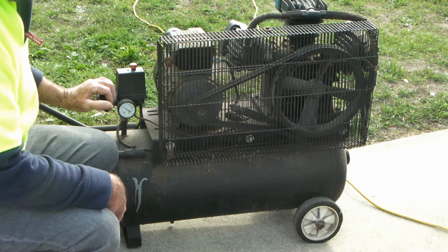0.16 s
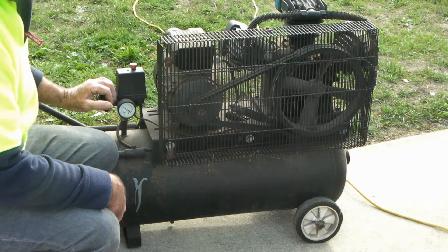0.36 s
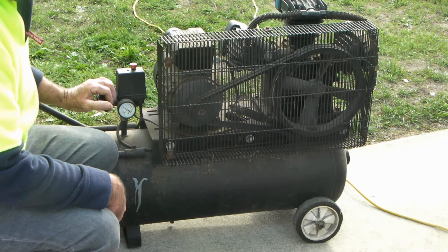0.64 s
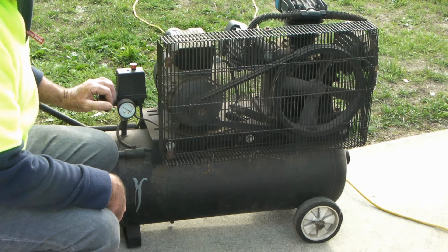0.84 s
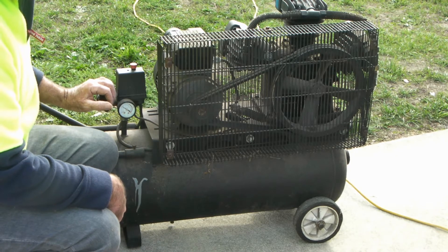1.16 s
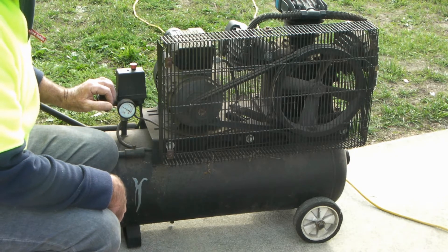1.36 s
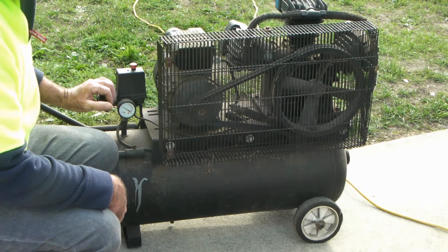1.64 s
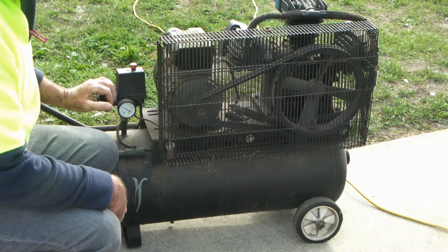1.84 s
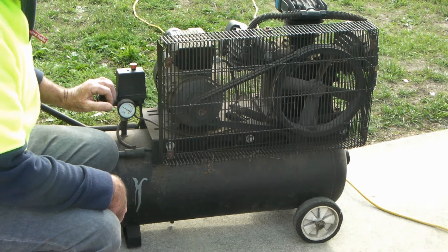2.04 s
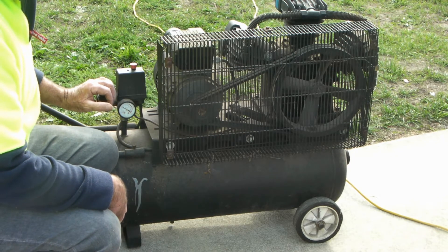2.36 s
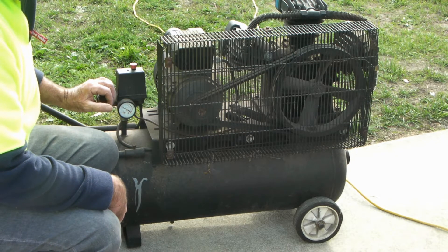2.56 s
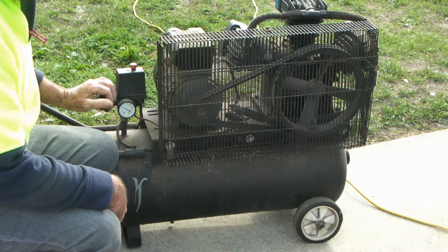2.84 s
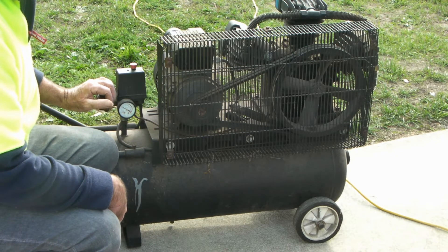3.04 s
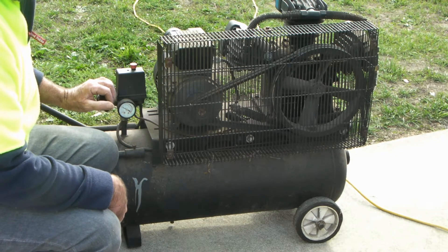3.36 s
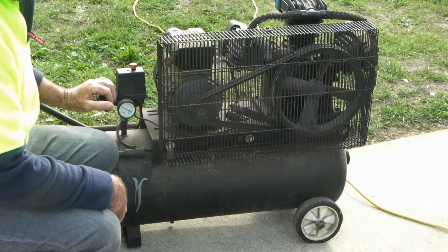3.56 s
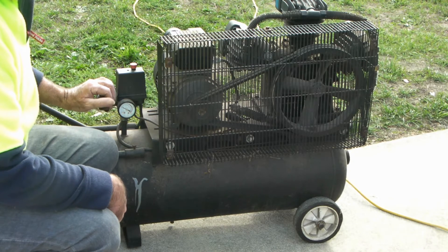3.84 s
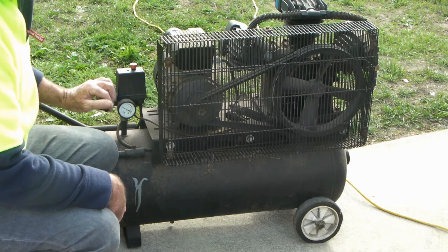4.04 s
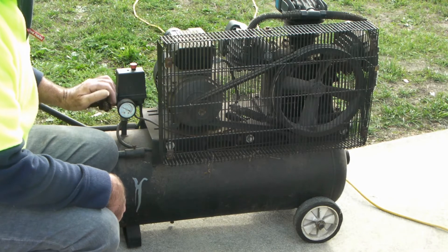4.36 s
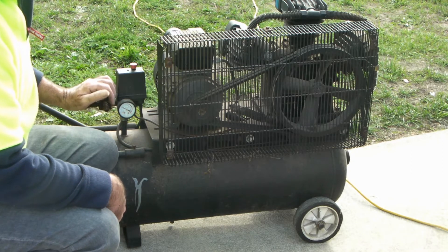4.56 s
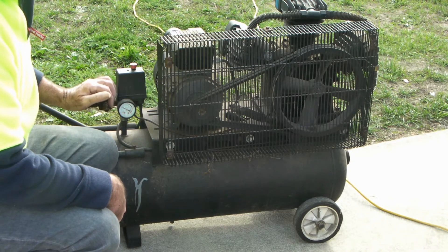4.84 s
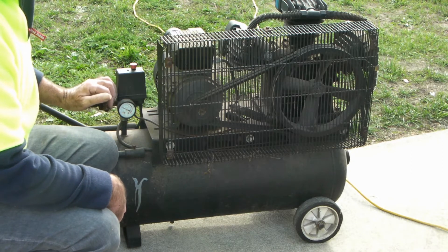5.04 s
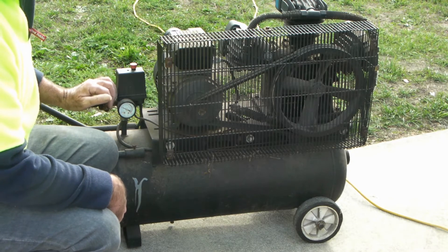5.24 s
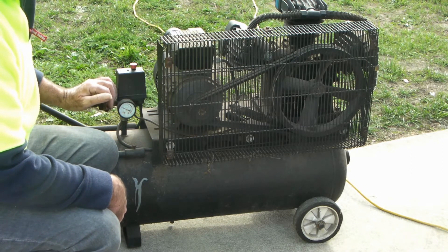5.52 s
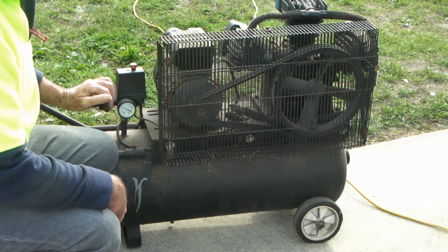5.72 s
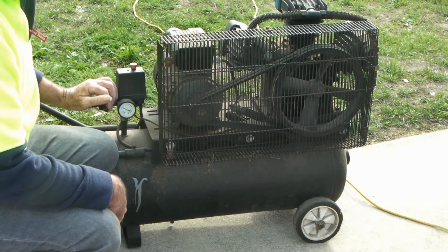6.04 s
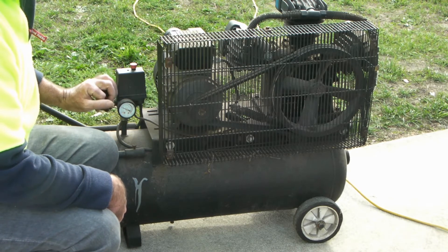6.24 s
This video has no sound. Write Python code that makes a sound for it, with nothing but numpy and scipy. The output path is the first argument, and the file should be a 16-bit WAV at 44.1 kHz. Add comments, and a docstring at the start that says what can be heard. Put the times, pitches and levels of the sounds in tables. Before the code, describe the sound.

A loud steady jet of compressed air hisses from a compressor tank outdoors, narrows to a whistling fizz, spits and shuts off abruptly.

```python
"""A loud jet of air roars while its valve is wide, thins to a whistling fizz as it narrows, spits and is shut.
Compressed air vents from the tank of a stopped workshop compressor outdoors, and a hand works the valve.
The jet is banded noise steered by valve and tank; resonant noise makes the ring, whistle and last wheeze.
A concrete slab reflects the hiss, machine and yard add short tails, and a faint distant hum lies beneath."""
import sys
import numpy as np
from scipy import signal
from scipy.fft import rfft, irfft
from scipy.io import wavfile

SR = 44100
rng = np.random.default_rng(int(sys.argv[2]) if len(sys.argv) > 2 else 0)


def generate_wav(signal):
    """Clip the signal to [-1, 1] and save it as 16-bit WAV at the path in sys.argv[1]."""
    frames = np.transpose(np.atleast_2d(signal))
    scaled = np.clip(frames, -1, 1) * 32767
    pcm = np.round(scaled).astype(np.int16)
    wavfile.write(sys.argv[1], SR, pcm)


N = 281792
TIME = np.arange(N) / SR  # s
FREQ = np.maximum(np.arange(N // 2 + 1) * SR / N, 1)  # Hz, kept above 0 for the logarithms

SPIT_S, SHUT_S = 6.056, 6.118
OUTDOORS_DB = -56.5
TOP_HZ = 15640  # upper edge of the sound

# Outdoor background colour. Each row: frequency in Hz, relative level in dB per Hz.
OUTDOORS_COLOUR = [(20, -24), (50, -6), (90, 3), (150, -8), (260, -13), (450, -4), (800, -9), (1500, -18),
                   (4000, -32), (9000, -32), (15000, -32)]
# Partials of the distant hum. Each row: centre frequency in Hz, level in dB before it wavers.
HUM_PARTIALS = [(47, -77), (83.8, -64.5), (100, -70), (144, -63.5)]
# Light wind on the microphone. Each row: time in s, level in dB before it wanders.
WIND_LEVEL = [(0, -63), (2.1, -67), (2.6, -80), (6.39, -80)]
# The two microphone ports. Each row: frequency in Hz, likeness from 0 to 1,
# left minus right level in dB, left phase lead in rad.
PORT_DIFFERENCES = [(100, 0.94, 0.5, .1), (1500, 0.96, 1.5, 0.11), (4060, 0.97, 1.1, .05),
                    (5120, 0.75, -1.5, 0.27), (5850, 0.24, 3, 1.24), (6800, 0.48, 3, 0.45),
                    (8650, 0.36, 5.5, .45), (9400, .54, 3.5, .15), (10200, 0.46, 3, 1.7),
                    (13000, 0.2, 4, .6), (15500, 0.5, 2, .3)]
# Turbulence of the free jet. Each row: frequency in Hz, relative level in dB per Hz.
JET_SPECTRUM = [(50, -35), (145, -17), (205, -24), (300, -23.5), (338, -11.5), (405, -5.5), (600, -11),
                (780, -10.5), (1200, -7.5), (1700, -6.5), (2400, -2.5), (3100, -0.5), (4500, -1.7),
                (5000, -1.4), (5500, -4.5), (7000, -2.5), (8400, -2.5), (9800, -2.6), (10500, -4),
                (13000, -5.5), (14300, -6), (15600, -7.3)]
# Resonances of the open valve body. Each row: frequency in Hz, damping width in Hz, relative level in dB.
BODY_MODES = [(907, 230, -6.5), (1530, 370, 1.2), (2270, 470, -5)]
# Resonances that sing as the gap narrows. Each row: frequency in Hz, damping width in Hz, relative level in dB.
GAP_MODES = [(2380, 330, -0.5), (4000, 420, 3), (9660, 1250, -6), (13000, 700, -8)]
# The hand on the valve. Each row: time in s, opening from 0 (nearly shut) to 1 (wide).
VALVE_OPENING = [(0, 0.44), (1.7, 0.6), (2.45, 0.75), (2.64, 0.91), (2.76, 0.9), (2.8, 0.34), (3.27, 0.42),
                 (3.48, .7), (3.7, 0.38), (3.88, 0.27), (4.0, 0.71), (4.14, 0.69), (4.26, 0.16),
                 (4.8, 0.15), (5.2, 0.33), (5.55, 0.13), (6.04, 0.56)]
# How each part of the jet follows valve and tank. Each holds: level in dB half open on a full tank,
# gain in dB from nearly shut to wide, loss in dB per s as the tank empties.
ROAR_FLOW = (-31, 4.3, 0.53)
HISS_FLOW = (-18, 2.3, 0.43)
FIZZ_FLOW = (-22, -2, 0.29)
HOLLOW_FLOW = (-31.5, 16, 0.12)
SEAT_FLOW = (-32.8, -11, 0)
# Breathy whistle at the edge of the gap. Each row: time in s, level in dB before it wavers.
WHISTLE_LEVEL = [(0, -35), (2.5, -30), (2.7, -45), (2.86, -34), (3.78, -33), (4.0, -46), (4.55, -35),
                 (4.76, -27.5), (5.5, -26.5), (6.04, -29)]


def undb(db):
    """Decibels to gain."""
    return 10 ** (np.asarray(db) / 20)


def unit(x):
    """Scale to rms 1."""
    return x / np.sqrt(np.mean(x ** 2))


def over_time(table):
    """The second column of a table, joined by straight lines in time."""
    return np.interp(TIME, *np.transpose(table))


def over_freq(table):
    """The columns of a table, joined by lines on a log-frequency axis."""
    hz, *columns = np.transpose(table)
    return [np.interp(np.log(FREQ), np.log(hz), column) for column in columns]


def shaped(x, response):
    """Filter by a frequency response."""
    return irfft(rfft(x) * response, N)


def below(hz, order):
    """Low-pass curve from 1 to 0 that passes one half at hz."""
    return 1 / (1 + (FREQ / hz) ** order)


def resonance(hz, width_hz):
    """Response of one damped resonance, gain 1 at its centre."""
    return 1 / (1 + 1j * (FREQ ** 2 - hz ** 2) / (FREQ * width_hz))


def modes(table):
    """Steep-sided resonances whose powers add, as if each were stirred by its own eddies."""
    power = sum(undb(2 * db) * np.abs(resonance(hz, width)) ** 4 for hz, width, db in table)
    return np.sqrt(power)


def walk(rate):
    """Smooth random wander of spread 1, up to about rate changes a second."""
    return unit(shaped(rng.standard_normal(N), below(rate, order=4)))


def air_noise(response):
    """Coloured noise at the two ports: nearly alike in the bass, less so in the treble."""
    likeness, left_db, lead = over_freq(PORT_DIFFERENCES)
    likeness = np.clip(likeness, 0, 1)
    mid, side = rfft(rng.standard_normal((2, N)))
    sign = np.array([[1], [-1]])  # left, right
    pair = mid * np.sqrt(1 + likeness) + sign * side * np.sqrt(1 - likeness)
    balance = undb(sign * left_db / 2)
    phase = np.exp(.5j * sign * lead)
    return unit(irfft(pair * response * balance * phase, N))


def outdoors():
    """A soft low bed of noise with a distant hum that wavers in level and pitch."""
    bed_db = OUTDOORS_DB + 1.6 * walk(rate=2.3)
    bed = air_noise(undb(over_freq(OUTDOORS_COLOUR)[0])) * undb(bed_db)
    hum = 0
    for hz, db in HUM_PARTIALS:
        level = undb(db + 2.0 * walk(rate=6.8))
        pitch_hz = hz + 1.94 * walk(rate=5.7)
        hum = hum + level * np.sin(2 * np.pi * np.cumsum(pitch_hz) / SR)
    return bed + np.sqrt(2) * hum  # root 2 turns rms level into sine peak


def wind():
    """Light wind pushes on the microphone as a deep, narrow band of noise."""
    rumble = air_noise(below(45, order=4) * (1 - below(30, order=4)))
    return rumble * undb(over_time(WIND_LEVEL) + 2 * walk(rate=4))


def echoes(x, db, t60_s, dull_hz, first_s):
    """A dense, fading cloud of reflections, different at each port."""
    tail = rng.standard_normal((2, N)) * undb(-60 * TIME / t60_s) * (TIME > first_s)
    tail = tail / np.sqrt(np.sum(tail ** 2, axis=1, keepdims=True))
    dulled = shaped(x, np.sqrt(below(dull_hz, order=4)))
    return undb(db) * signal.fftconvolve(dulled, tail, axes=1)[:, :N]


def slab(lag_ms=1.28, share=0.18, dull_hz=7500):
    """The bounce off the concrete arrives just after the direct sound and ripples its spectrum."""
    delay = np.exp(-2j * np.pi * FREQ * lag_ms / 10 ** 3)
    return 1 + share * below(dull_hz, order=4) * delay


def closing(fall_s, start_s=SHUT_S):
    """The flow dies away exponentially as the valve meets its seat."""
    return np.exp(-np.maximum(TIME - start_s, 0) / fall_s)


def flow(db, opening_db, sag_db_per_s):
    """Gain of one part of the jet: it follows the valve and sinks with the tank pressure."""
    opening = over_time(VALVE_OPENING)
    return undb(db + opening_db * (opening - .5) - sag_db_per_s * TIME)


def wheeze(db=-26, hz=6100, width_hz=3200, start_s=6.09, rise_s=0.021, fall_s=0.04):
    """The last air squeezes past the seat in a soft, fading sizzle."""
    age = np.maximum(TIME - start_s, 0)
    swell = (1 - np.exp(-age / rise_s)) ** 2 * np.exp(-age / fall_s)
    return air_noise(resonance(hz, width_hz) ** 2) * undb(db) * swell / swell.max()


def spit(db=-14.0, rise_s=0.0041, fall_s=0.06, edge_hz=5200):
    """Just before it shuts, the gap throws a short bright burst."""
    age = np.maximum(TIME - SPIT_S, 0)
    burst = (1 - np.exp(-age / rise_s)) * np.exp(-age / fall_s)
    colour = np.sqrt((1 - below(edge_hz, order=6)) * below(11400, order=4))
    return air_noise(colour) * undb(db) * burst / burst.max() * closing(fall_s=0.024)


def whistle(hz=9050, width_hz=1200, rise_hz_per_s=300, narrow_s=4.75):
    """The edge of the gap sings a breathy whistle that creeps upward once the valve is narrow."""
    age = np.maximum(TIME - narrow_s, 0)
    glide = np.exp(2j * np.pi * np.cumsum(rise_hz_per_s * age) / SR)
    breath = air_noise(resonance(hz, width_hz) ** 2)
    tone = np.real(signal.hilbert(breath) * glide)  # shifts the whole band upward
    db = over_time(WHISTLE_LEVEL) + 0.8 * walk(rate=12)
    return tone * undb(db) * closing(fall_s=0.025)


def jet():
    """Large eddies roar, smaller ones hiss, the finest fizz at the lip; valve body and seat gap ring."""
    colour = undb(over_freq(JET_SPECTRUM)[0]) * slab()
    # power shares that split the jet into three bands
    large, coarse = below(1700, order=6), below(8230, order=8)
    roar = air_noise(colour * np.sqrt(large)) * flow(*ROAR_FLOW)
    hiss = air_noise(colour * np.sqrt((1 - large) * coarse)) * flow(*HISS_FLOW)
    fizz = air_noise(colour * np.sqrt(1 - coarse)) * flow(*FIZZ_FLOW)
    hollow = air_noise(modes(BODY_MODES)) * flow(*HOLLOW_FLOW)
    seat = air_noise(modes(GAP_MODES)) * flow(*SEAT_FLOW)
    # the large eddies are the first to go when the valve closes
    roar = roar * closing(fall_s=0.058, start_s=6.05)
    hiss = hiss * closing(fall_s=0.042, start_s=6.10)
    fizz = fizz * closing(fall_s=0.037)
    hollow = hollow * closing(fall_s=0.028)
    seat = seat * closing(fall_s=0.027)
    # eddies make the whole jet flutter; fizz and seat sputter fastest
    flutter_db = 0.33 * walk(rate=18)
    sputter_db = 0.4 * walk(rate=300)
    waver_db = 1.7 * walk(rate=13)
    parts = roar + hiss + hollow * undb(waver_db) + (fizz + seat) * undb(sputter_db)
    return parts * undb(flutter_db)


def scene():
    """The venting air, scattered at once by tank and belt guard and later by the yard, over the background."""
    air = jet() + whistle() + spit() + wheeze()
    machine = echoes(air, db=-11.5, t60_s=0.053, dull_hz=18000, first_s=0.00208)
    yard = echoes(air, db=-18.5, t60_s=0.55, dull_hz=6500, first_s=0.015)
    return outdoors() + wind() + yard + machine + air


def record(dry):
    """The microphone sheds the deepest rumble and has one narrow treble notch; the top is cut steeply."""
    rumble_hz, notch_hz, notch_width_hz = 38, 7890, 340
    lean = signal.sosfilt(signal.butter(4, rumble_hz, "high", fs=SR, output="sos"), dry)
    notched = signal.lfilter(*signal.iirnotch(notch_hz, notch_hz / notch_width_hz, fs=SR), lean)
    return signal.sosfilt(signal.ellip(12, .1, 80, TOP_HZ, fs=SR, output="sos"), notched)


dry = scene()
out = record(dry)
generate_wav(out)
```